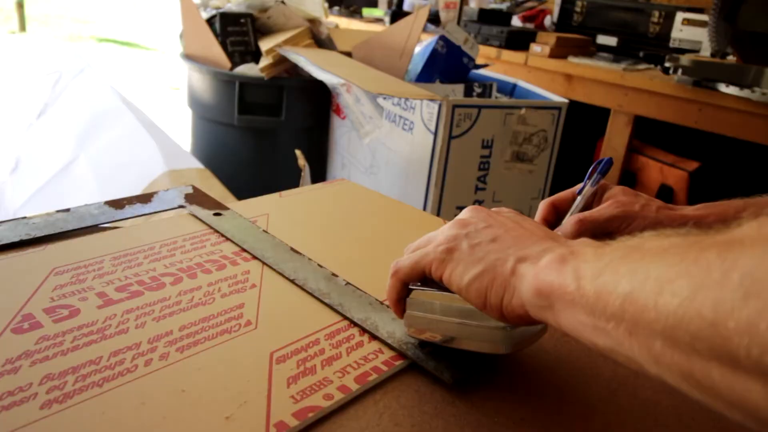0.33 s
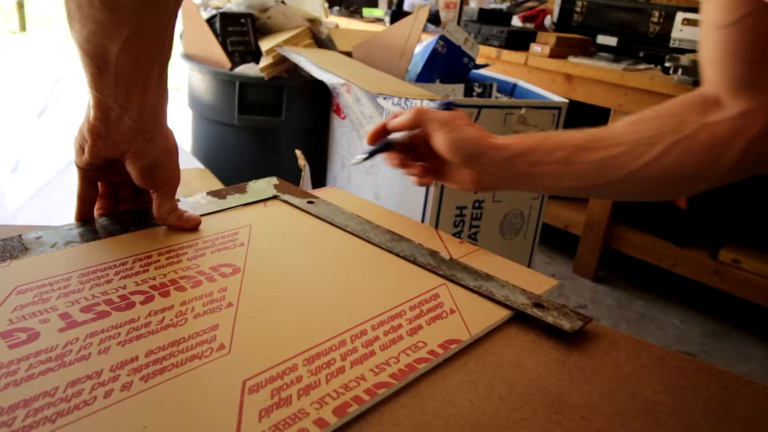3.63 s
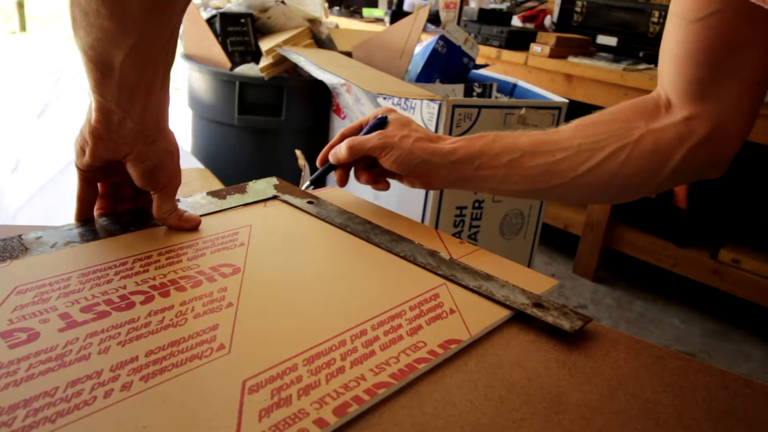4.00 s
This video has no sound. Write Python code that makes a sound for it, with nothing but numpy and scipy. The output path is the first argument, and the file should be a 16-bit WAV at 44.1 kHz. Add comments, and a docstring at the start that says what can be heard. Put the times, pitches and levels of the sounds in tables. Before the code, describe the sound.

Close up in a garage, over quiet air and a low hum, a steel straightedge clatters and lands on a plastic sheet covered with cardboard. A few knocks, a small metallic ping, soft sliding and a brief scrape follow. A hand saw then makes five fast back-and-forth strokes, its gritty buzz rising and falling in pitch, and the blade rings faintly at the first turn.

```python
"""Garage air; a mains hum comes up at 0.4 s. From 1.2 s a steel straightedge clacks and is set down on a
cardboard-covered acrylic sheet. Things slide over the sheet, and a short scrape swells to 4.8 s.
From 5.7 s a hand saw makes five quick strokes: its teeth chip the edge at a rate that rises and falls
with the arm, the sheet buzzes at that rate, and the blade sings at the first turn."""
import sys
import numpy as np
from scipy import signal
from scipy.fft import rfft, irfft
from scipy.io import wavfile

SR = 44100
rng = np.random.default_rng(int(sys.argv[2]) if len(sys.argv) > 2 else 0)


def store_pcm(level_fs):
    """Save levels as 16-bit WAV."""
    pcm = np.round(np.clip(level_fs, -1, 1) * 32767).astype(np.int16)
    wavfile.write(sys.argv[1], SR, np.atleast_2d(pcm).T)


N = 312360

# sheet on its bench: mode_hz, level_db, t60_s
SHEET_MODES = [(114.5, 1, 0.17), (177.7, 1, 0.27), (296, -3.5, 0.22), (344, -15.5, 0.085), (402, -2, 0.047),
               (539.4, -1.5, 0.51), (711, 3.5, 0.18)]
# sheet and blade at the cut: mode_hz, width_hz, level_db
CUT_MODES = [(420, 77, -4.5), (526, 44, 2.5), (892, 40, 2), (1067, 58, 1), (1160, 41, -1.5),
             (1404, 112, 0.5), (2003, 114, -1), (2440, 520, -6), (3040, 300, -4.5), (3240, 110, -9.5)]
# broad colour of the cut: freq_hz, density_db
CUT_SPECTRUM = [(30, -33), (130, -10), (260, -20), (660, 3.5), (790, 0), (900, -2), (1450, 0.5),
                (1700, -11), (2200, -0.5), (3280, -13), (3700, -5), (5000, -16.5), (7000, -16),
                (16000, -52)]
# hiss of the finest cracks: freq_hz, density_db
DUST_SPECTRUM = [(2500, -16), (4500, -9.5), (5300, -16), (5800, -4.5), (6400, -18.5), (7600, -13.5),
                 (8900, -9.5), (9900, -0.5), (10800, -8), (11600, -16), (12700, -6), (14000, -18),
                 (15800, -13)]
# a tooth catches: start_s, level_db
SNAGS = [(5.661, -28.5), (5.966, -35.5), (6.037, -14), (6.048, -16.5), (6.164, -12), (6.179, -42),
         (6.311, -39.5), (6.641, -35), (6.758, -13), (6.8308, -11), (6.987, -30)]


def amp(db):
    """Decibels to gain."""
    return 10 ** (np.asarray(db) / 20)


def unit(x):
    """Scale to rms 1."""
    return x / np.sqrt(np.mean(x ** 2) + 1e-20)


def lookup(points, hz):
    """Interpolate on a log-frequency axis."""
    freq_hz, value = np.transpose(points)
    return np.interp(np.log(hz + 1), np.log(freq_hz + 1), value)


def add(mix, start_s, sound):
    """Mix in place from start_s."""
    part = mix[round(start_s * SR):][:len(sound)]
    part += sound[:len(part)]


def drift(rate_hz):
    """Low-passed noise, rms 1."""
    lowpass = np.exp(-(np.fft.rfftfreq(N, 1 / SR) / rate_hz) ** 2)
    return unit(irfft(rfft(rng.standard_normal(N)) * lowpass, N))


def swell(start_s, peak_s, end_s, depth_db, edge_s=0.019):
    """Gain rising by depth_db to the peak, then falling; zero outside."""
    t = np.arange(N) / SR
    gate = np.clip(np.minimum(t - start_s, end_s - t) / edge_s, 0, 1)
    return amp(np.interp(t, [start_s, peak_s, end_s], [-depth_db, 0, -depth_db])) * gate


def colour(x, spectrum, modes=(), size=4096):
    """Minimum-phase filter: broad spectrum plus resonance peaks."""
    hz = abs(np.fft.fftfreq(size, 1 / SR))
    peaks = sum(amp(db + 6.5) ** 2 / (1 + ((hz - f) / width) ** 2) ** 2 for f, width, db in modes)
    log_gain = .5 * np.log(amp(lookup(spectrum, hz)) ** 2 + peaks + 1e-12)
    response = np.fft.ifft(np.exp(np.conj(signal.hilbert(log_gain)))).real
    return signal.oaconvolve(x, response[:size // 2])[:len(x)]


def damped_sines(modes, size=SR):
    """Free decay of a set of modes."""
    t = np.arange(size) / SR
    return sum(amp(db - 60 * t / t60_s) * np.sin(2 * np.pi * hz * t) for hz, db, t60_s in modes)


def ring(x, modes):
    """Drive modes with x; their response has energy 1."""
    response = damped_sines(modes, size=22050)
    return signal.oaconvolve(x, response / np.linalg.norm(response))[:len(x)]


def burst(decay_s, size=22050):
    """Dying flurry of tiny contacts."""
    return rng.standard_normal(size) * np.exp(-np.arange(size) / SR / decay_s)


def sized(x, db, decay_s):
    """Scale a hit to the energy of a tone starting at db with time constant decay_s."""
    return x / np.linalg.norm(x) * amp(db) * np.sqrt(decay_s * SR) / 2


def mains_hum(mains_hz=59.3, waver_db=3.0, wander_rad=0.45):
    """Mains harmonics, each wavering in level and phase."""
    harmonics = [(2, -60), (3, -62), (4, -65.5), (6, -69), (8, -66)]  # multiple, level_db
    t, out = np.arange(N) / SR, np.zeros(N)
    for k, db in harmonics:
        waver = amp(waver_db * drift(6.9))
        phase = 2 * np.pi * (k * mains_hz * t + rng.random()) + wander_rad * drift(4.5)
        out += amp(db) * unit(waver * np.sin(phase))
    return out


def background(air_db=-54.5, rise_at_s=.39, early_db=-6.0, low_hz=300):
    """Room air; its low murmur and the hum step up at rise_at_s."""
    air_spectrum = [(22, -29), (35, -30), (50, -4), (80, -10), (120, -3.5), (200, -2.5), (300, -7.5),
                    (500, -13), (900, -13), (2000, -18.5), (3900, -21.5), (5000, -32), (8000, -40),
                    (15800, -48.5)]  # freq_hz, density_db
    rise = amp(early_db * np.clip((rise_at_s - np.arange(N) / SR) / 0.0076, 0, 1))
    hum = mains_hum()
    air = amp(air_db) * unit(colour(rng.standard_normal(N), air_spectrum))
    murmur = signal.sosfiltfilt(signal.butter(2, low_hz, fs=SR, output="sos"), air)
    return air - murmur + rise * murmur + rise ** 2 * hum


def garage(x, gap_s=0.013, size=22050):
    """Sparse wall reflections after a short gap."""
    wall_colour = [(100, 11), (1000, -2.5), (3500, 2.5), (6000, 3.5), (9000, -8.5), (16000, -10)]  # freq_hz, gain_db
    decay_times = [(100, 0.25), (500, 0.35), (3000, 0.3), (8000, 0.29), (16000, 0.35)]  # freq_hz, t60_s
    taps = rng.choice([-1., 1.], size) * (rng.random(size) < .08) * (np.arange(size) / SR > gap_s)
    hz, t, frames = signal.stft(taps, SR, nperseg=256)
    gain_db = lookup(wall_colour, hz)[:, None] - 60 * t / lookup(decay_times, hz)[:, None]
    tail = signal.istft(frames * amp(gain_db), SR, nperseg=256)[1]
    return signal.oaconvolve(x, tail / np.linalg.norm(tail))[:N]


def plate(x, share=0.36, decay_s=0.0079):
    """Bending waves cross the sheet and return: a short, dense ring."""
    echoes = burst(decay_s, size=4096)
    return x + share * signal.oaconvolve(x, echoes / np.linalg.norm(echoes))[:N]


def slides(grain_db=1.5, ticks_per_s=70, tick_db=18.0, shift_db=8.5, scratch_db=1.5):
    """Paper fibres catch and release under a sliding object; grit ticks, the bench rumbles."""
    moves = [(1.194, 1.242, 1.344, -55, -48.5, -59), (1.47, 1.7, 1.72, -54, -59, -58),
             (2.288, 2.45, 2.643, -41, -50, -44.5), (2.49, 2.656, 2.814, -41.5, -51.5, -43),
             (2.85, 3.08, 3.32, -50, -61.5, -51), (3.187, 3.315, 3.47, -63, -63, -50.5),
             (3.48, 3.68, 3.7, -52, -58.5, -45.5), (4.11, 4.822, 4.88, -35.5, -49.5, -53),
             (5.147, 5.376, 5.55, -56, -61.5, -50)]  # start_s, peak_s, end_s, rub_db, hiss_db, rumble_db
    rub_modes = [(455, 100, -0.5), (903, 86, 2.5), (1190, 43, -17), (1665, 130, -2), (2000, 45, -7.5),
                 (2640, 34, -30)]  # mode_hz, width_hz, level_db
    rub_spectrum = [(120, -53.5), (250, -2.5), (450, 5), (700, 2), (1000, 10), (1500, 4), (2500, -5),
                    (3700, -2.5), (5000, -20.5), (7000, -36.5)]  # freq_hz, density_db
    hiss_spectrum = [(3000, -12), (4500, -4), (6000, -8), (8000, -7.5), (11000, -8.5), (13000, -9.5),
                     (15800, -13)]  # freq_hz, density_db
    rumble_spectrum = [(25, -32), (55, -6), (110, 0.5), (170, -2.5), (300, -3), (600, -6.5), (2000, -71)]  # freq_hz, density_db
    ticks = amp(tick_db) * rng.uniform(-1.3, 1, N) * (rng.random(N) < ticks_per_s / SR)
    friction = rng.standard_normal((3, N)) * amp(grain_db * drift(240)) + ticks
    resonance = np.zeros(N)
    for hz, width_hz, db in rub_modes:  # the moving contact wakes now one mode, now another
        mode = signal.lfilter(*signal.iirpeak(hz, hz / width_hz, SR), friction[0])
        resonance += amp(db + shift_db * np.tanh(drift(14))) * mode
    rub = unit(plate(colour(friction[0], rub_spectrum) + 1.43 * resonance))
    hiss = amp(-1) * unit(colour(friction[1] * amp(scratch_db * drift(90)), hiss_spectrum))
    rumble = amp(-3.5) * unit(colour(friction[2], rumble_spectrum))
    layers = [(rub, 22), (hiss, 14), (rumble, 12)]  # signal, depth_db
    return sum(amp(db) * swell(start_s, peak_s, end_s, depth_db) * layer
               for start_s, peak_s, end_s, *levels_db in moves
               for db, (layer, depth_db) in zip(levels_db, layers))


def steel_hiss(centre_hz=3170, width_hz=900, depth_db=22.5):
    """A band of hiss near 3 kHz: one short steel slide, and the rattling tails of two loud clacks."""
    swells = [(1.236, 1.252, 1.34, -42.5), (1.446, 1.59, 1.7, -52.5), (1.687, 1.71, 1.826, -34.5)]  # start_s, peak_s, end_s, level_db
    hiss = signal.lfilter(*signal.iirpeak(centre_hz, centre_hz / width_hz, SR), rng.standard_normal(N))
    return sum(amp(db) * swell(*times_s, depth_db) for *times_s, db in swells) * unit(hiss)


def knocks(ring_share=0.12, boom_at_s=1.8708, boom_hz=47, boom_db=-37, boom_t60_s=.62):
    """A blunt push and its settling ring the sheet; the heaviest blow rocks the bench."""
    blows = [(1.222, -42.5, 258, 536, 0.046), (1.8491, -28.5, 118, 467, 0.026),
             (1.8703, -15, 175, 410, 0.01), (1.879, -28, 55.5, 198, 0.02), (2.441, -22.5, 193, 462, .011),
             (2.457, -22.5, 186, 710, .024), (2.475, -23.5, 140, 263, 0.017),
             (3.03, -41.5, 140, 310, 0.015), (3.074, -40, 270, 507, 0.067), (3.626, -32, 210, 580, 0.014),
             (4.828, -28, 109, 364, .014), (5.024, -40, 131, 336, 0.053)]  # start_s, level_db, low_hz, high_hz, decay_s
    out = np.zeros(N)
    for start_s, db, low_hz, high_hz, decay_s in blows:
        settling = burst(decay_s)
        push = signal.unit_impulse(len(settling)) + settling / np.linalg.norm(settling)
        band = signal.butter(2, [low_hz, high_hz], "band", fs=SR, output="sos")
        thud = signal.sosfilt(band, push + ring_share * ring(push, SHEET_MODES))
        add(out, start_s, sized(thud, db, decay_s))
    add(out, boom_at_s, damped_sines([(boom_hz, boom_db, boom_t60_s)]))
    return out


def clacks(ping_at_s=2.457):
    """Hand-damped steel chatters on a hard surface, and rings freely once as it lands."""
    contacts = [(1.195, -45, 11000, 1.1, 0.0011, 0), (1.2435, -20.5, 9700, .63, 0.0018, 0),
                (1.2429, -16, 3940, .8, 0.0027, 0.12), (1.569, -40, 6000, 1.6, 0.009, 0.29),
                (1.657, -41.5, 6960, 1.4, 0.049, 0.4), (1.7021, -23.5, 6800, 1.4, 0.0027, 0.041),
                (1.714, -12, 5400, 2, 0.0022, 0.17), (1.717, -11.5, 2150, 2, .0041, 0.42),
                (1.758, -38, 6850, .5, 0.022, 0), (1.833, -37, 6000, 1.1, .0029, 0),
                (1.8371, -23.5, 5150, 0.95, 0.0073, 0.091), (1.8695, -22, 1060, 1.14, 0.01, 0.061),
                (1.871, -27, 3000, 1.5, 0.0014, 0.084), (1.889, -30.5, 5460, 0.67, 0.0054, 0),
                (1.911, -30, 7400, 1.2, 0.0019, 0.26), (2.4424, -32, 1500, 2, 0.0023, .04),
                (2.455, -26.5, 1970, 0.96, 0.0056, .15), (3.289, -45, 12950, 0.34, 0.01, 0),
                (3.988, -39, 1290, 1.38, 0.0061, .12), (4.093, -37, 9000, 1.3, .002, .15),
                (4.7015, -32, 4000, 2.1, 0.00072, 0.037), (4.828, -37, 5500, 2.3, 0.0023, 0.083),
                (5.027, -54.5, 7000, 1.5, 0.007, 0)]  # start_s, level_db, centre_hz, spread_oct, chatter_s, ring_share
    steel_modes = [(575, -7, 0.13), (1840, -30, 0.063), (2130, -3, 0.19), (2500, -26, 0.053),
                   (2630, -23, .07), (3080, -20, .05), (3440, 11.5, 0.072), (3820, 14, 0.044),
                   (8700, 0, .03)]  # mode_hz, level_db, t60_s
    ping_modes = [(1890, -41.5, 0.26), (3190, -30.5, 0.2), (3580, -43, 0.24), (4620, -45, 0.13)]  # mode_hz, level_db, t60_s
    out, hz = np.zeros(N), np.geomspace(30, SR / 2, 40)
    for start_s, db, centre_hz, spread_oct, chatter_s, ring_share in contacts:
        chatter = burst(chatter_s)
        clack = chatter + ring_share * ring(chatter, steel_modes)
        offset_oct = np.log2(hz / centre_hz)
        hump_db = np.maximum(-4.3 * (offset_oct / spread_oct) ** 2, -50) - 3 * offset_oct
        add(out, start_s, sized(colour(clack, np.c_[hz, hump_db]), db, chatter_s))
    add(out, ping_at_s, damped_sines(ping_modes))
    return out


def blade(pitch_hz=1502, depth_db=5.0):
    """One bending mode of the saw sings while the arm turns round."""
    free_ring = (5.74, 5.9, 6.03, -44.5)  # start_s, peak_s, end_s, level_db
    *times_s, db = free_ring
    return amp(db) * swell(*times_s, depth_db) * unit(np.sin(2 * np.pi * pitch_hz * np.arange(N) / SR))


def snags(decay_s=0.0029):
    """A caught tooth snaps a larger chip out of the edge."""
    out = np.zeros(N)
    for start_s, db in SNAGS:
        chip = colour(burst(decay_s), CUT_SPECTRUM, CUT_MODES)
        dust = colour(burst(decay_s), DUST_SPECTRUM)
        add(out, start_s, sized(chip + .5 * dust, db, decay_s))
    return out


def arm(turn_hz=100, reference_hz=450, arch_power=1.85, ease=1.34, linger_s=0.098, brake=.5, brake_s=.03):
    """Arches of speed, braked by snags. Returns tooth rate and bite, dust, buzz and judder gains."""
    # pull and push in turn: start_s, top_s, stop_s, landing_hz, top_hz, press_s, release_s,
    # bite_db, dust_db, buzz_db, judder_db
    strokes = [(5.658, 5.765, 5.907, 330, 449, 0.0033, 0.047, -30.5, -38, -30, -39),
               (5.962, 6.116, 6.277, 250, 544, 0.0067, 0.026, -28, -36, -30, -30),
               (6.305, 6.483, 6.616, 200, 462, 0.012, 0.048, -31, -40, -30.5, -34),
               (6.645, 6.819, 6.965, 150, 553, 0.036, 0.066, -27.5, -35, -29.5, -33.5),
               (6.977, 7.139, 7.28, 270, 590, 0.011, 0.052, -31.5, -41, -30.5, -35)]
    t = np.arange(N) / SR
    tooth_hz, gains = np.full(N, float(turn_hz)), np.zeros((4, N))
    for start_s, top_s, stop_s, landing_hz, top_hz, press_s, release_s, *levels_db in strokes:
        edge_s = np.where(t < top_s, start_s, stop_s)
        edge_hz = np.where(t < top_s, landing_hz, turn_hz)
        arch_hz = top_hz - (top_hz - edge_hz) * abs((t - top_s) / (edge_s - top_s)) ** arch_power
        tooth_hz = np.where((t >= start_s) & (t < stop_s), arch_hz, tooth_hz)
        landed = np.clip((t - start_s) / press_s, 0, 1)
        pressure = landed * np.clip((stop_s - t) / release_s, 0, 1) ** ease
        bench_shake = landed * np.clip((stop_s + linger_s - t) / (release_s + linger_s), 0, 1)
        gains += amp(levels_db)[:, None] * [pressure, pressure, pressure, bench_shake]
    for start_s, db in SNAGS:
        since = np.maximum(t - start_s, 0) / brake_s
        tooth_hz /= 1 + brake * amp(db) * since * np.exp(1 - since)
    growth_db_per_oct = [5, 12.5, 0, 0.5]
    return tooth_hz, gains * amp(np.outer(growth_db_per_oct, np.log2(tooth_hz / reference_hz)))


def sheet_buzz(tooth_hz, teeth, cracks, bite_gain, buzz_gain, skip_below_hz=295, patchy_db=6.0):
    """Fast teeth push the sheet evenly and make a note; slow ones skip and rattle it."""
    response = [(300, -4), (360, -2), (400, 0.5), (435, -3.5), (465, 0), (495, -2.5), (530, 2)]  # tooth_hz, gain_db
    lifts = [(5.791, 5.817, 5.87, -4.5), (6.027, 6.047, 6.05, 11.5), (6.369, 6.417, 6.46, 10)]  # sheet lifts off the bench, buzzes freely: start_s, peak_s, end_s, gain_db
    even = 1 / (1 + (skip_below_hz / tooth_hz) ** 8)
    first, second, third = (unit(amp(patchy_db * np.tanh(drift(26))) * np.sin(2 * np.pi * k * teeth))
                            for k in (1, 2, 3))
    lifted = 1 + sum(amp(db) * swell(*times_s, depth_db=9.0) for *times_s, db in lifts)
    note = amp(lookup(response, tooth_hz) - 0.5) * lifted * even * first
    rattle = amp(-3) * (1 - even) * unit(ring(cracks, SHEET_MODES))
    # under a hard bite, overtones flare as they glide through the modes of the cut
    flare = colour(amp(-5) * second + amp(-6) * third, CUT_SPECTRUM, CUT_MODES) / 2
    return buzz_gain * (note + rattle) + even * bite_gain ** 2 / bite_gain.max() * flare


def saw(jitter=.026, sway=.015, tooth_db=2.5, grit_db=1.5, bite_share=0.56, drag=0.4, uneven_db=1.6):
    """Each tooth chips the edge in a puff of cracks and pushes the sheet."""
    tooth_hz, (bite_gain, dust_gain, buzz_gain, judder_gain) = arm()
    teeth = np.cumsum(tooth_hz * (1 + jitter * drift(150) + sway * drift(20))) / SR
    tooth, phase = teeth.astype(int), teeth % 1
    depth = amp(tooth_db * np.clip(rng.standard_normal(N), -2, 2))[tooth]
    hand_pressure = amp(uneven_db * drift(30))
    cutting = (drag + depth * np.exp(-phase / bite_share)) * hand_pressure
    cracks = cutting * rng.standard_normal((4, N))
    cracks *= amp(grit_db * np.clip(rng.standard_normal((4, N)), -2, 2))
    rasp = amp(0.5) * bite_gain * unit(plate(colour(cracks[0], CUT_SPECTRUM, CUT_MODES)))
    hiss = dust_gain * unit(colour(cracks[1], DUST_SPECTRUM))
    judder_spectrum = [(25, -26), (48, -0.5), (85, 1), (110, 4.5), (145, -9.5), (180, -6), (270, 4.5),
                       (340, 0), (600, -10.5), (2000, -83)]  # shaking bench: freq_hz, density_db
    judder = amp(-5.5) * judder_gain * unit(colour(cracks[2], judder_spectrum))
    return rasp + hiss + judder + sheet_buzz(tooth_hz, teeth, cracks[3], bite_gain, buzz_gain)


def scene(saw_room_db=-16.0, handling_room_db=-17.5):
    """Close sources with the garage behind them; mono."""
    sawing = saw() + snags()
    handling = clacks() + knocks() + slides() + steel_hiss()
    echo = garage(amp(saw_room_db) * sawing + amp(handling_room_db) * handling)
    return (sawing + blade() + handling + echo + background())[None]


def record(dry):
    """Low-pass at 15.9 kHz."""
    lowpass = signal.firwin(511, 15900, window=("kaiser", 9), fs=SR)
    return signal.oaconvolve(dry, lowpass[None], "same")


dry = scene()
out = record(dry)
store_pcm(out)
```